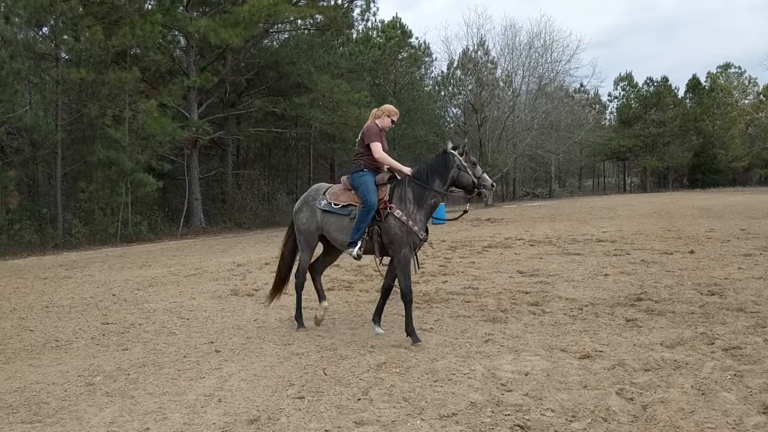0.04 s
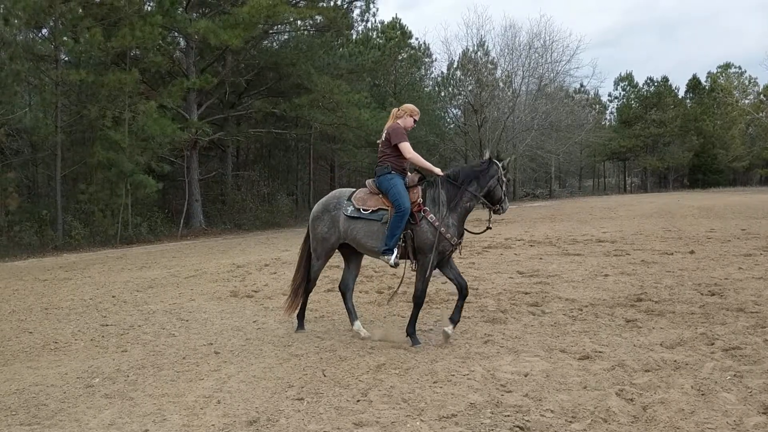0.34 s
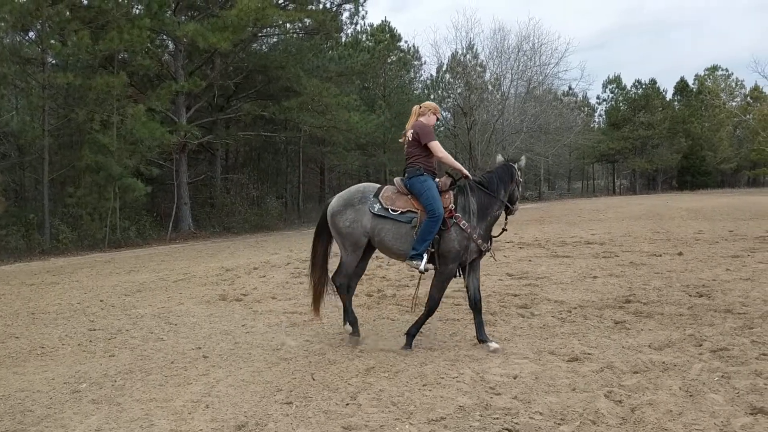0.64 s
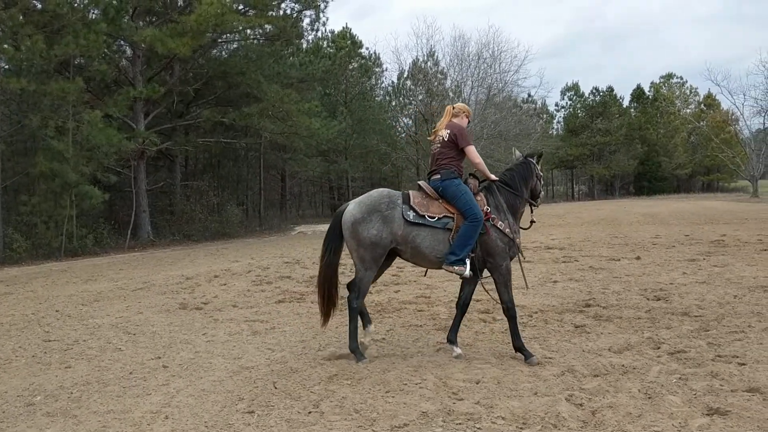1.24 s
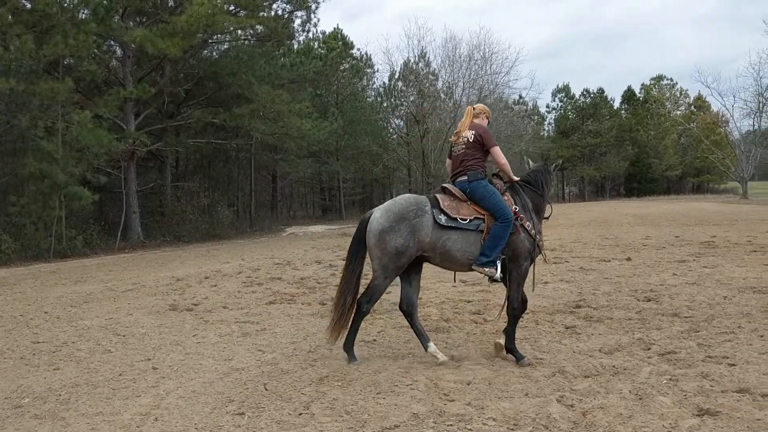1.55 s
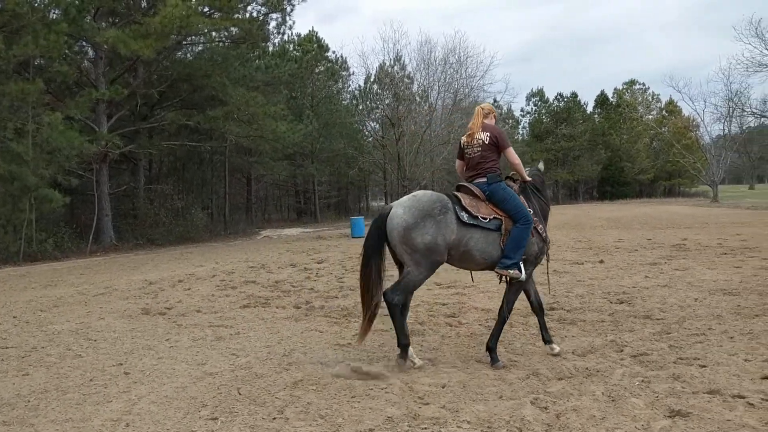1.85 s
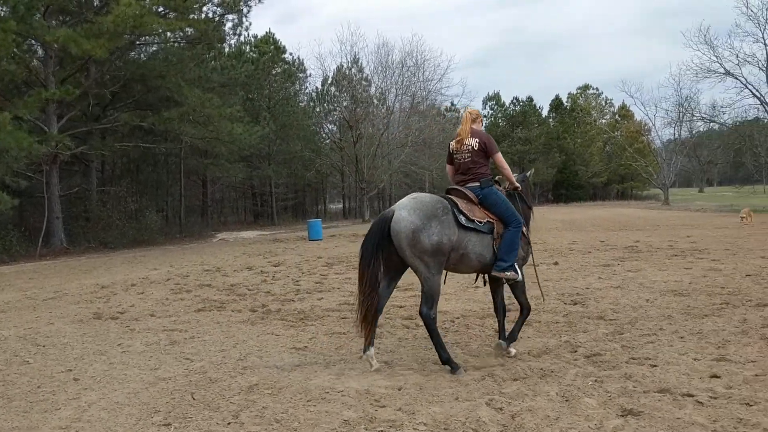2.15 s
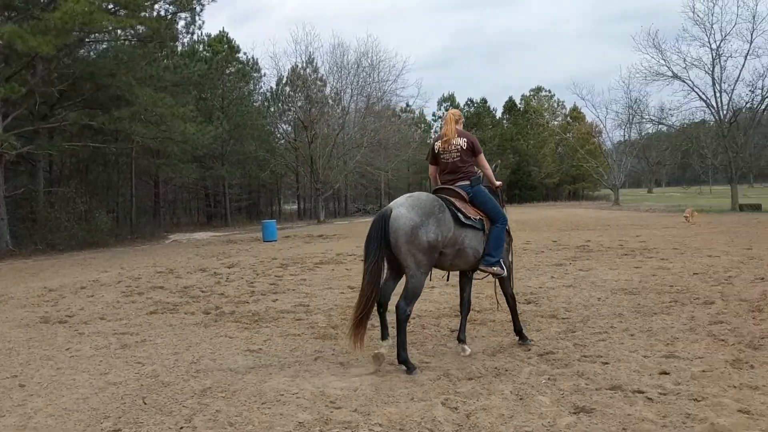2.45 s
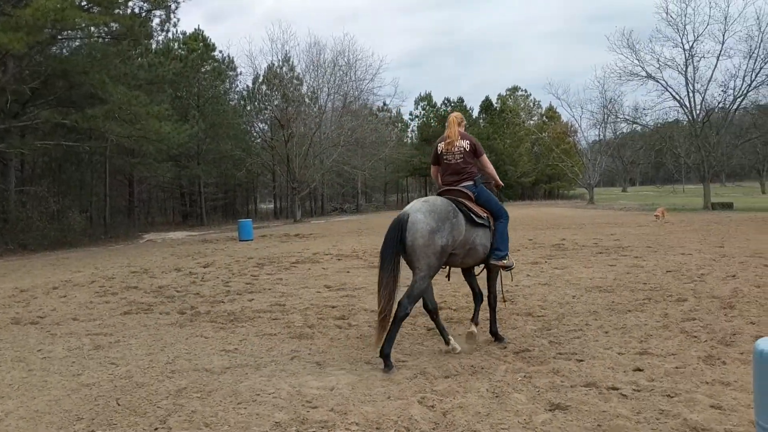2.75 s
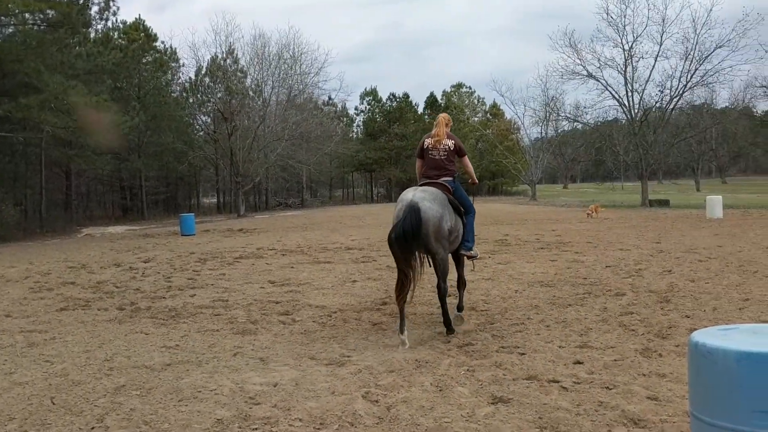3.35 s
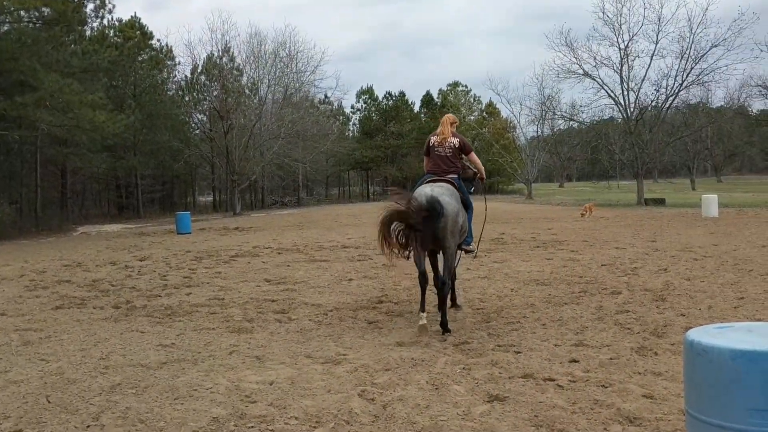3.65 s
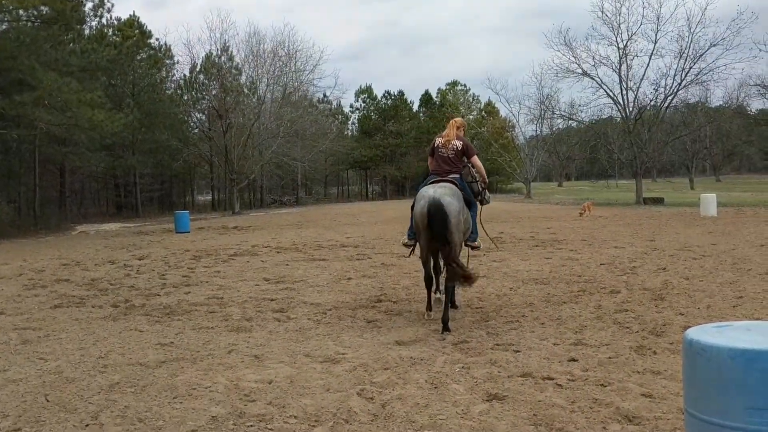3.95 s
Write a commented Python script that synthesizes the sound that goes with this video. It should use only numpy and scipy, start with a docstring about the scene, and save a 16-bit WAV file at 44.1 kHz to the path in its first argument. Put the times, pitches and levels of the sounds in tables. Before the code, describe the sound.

Soft hoof steps and scuffs of a horse pass nearby on sand outdoors, over light wind and a far engine. Buckles clink, birds chirp thinly and the rider seems to cluck six times, before a strap snaps once, sharply.

```python
"""Soft knocks and scuffs of a horse walking on arena sand, over a far engine drone and light wind.
Its tack clinks and ticks; straps slide through a ring. A small bird chirps thinly, another answers from afar.
Six quick smacks, probably the rider clucking the horse on, are tiny pops with cavity resonances.
Near the end a leather strap snaps once. Trees throw back a faint echo."""
import sys
import numpy as np
from scipy import signal
from scipy.fft import rfft, irfft
from scipy.io import wavfile
from scipy.ndimage import uniform_filter1d

SR = 44100
rng = np.random.default_rng(int(sys.argv[2]) if len(sys.argv) > 2 else 0)


def unload_audio(sound):
    """Save the sound as a 16-bit wav file, at the path given as the first command line argument."""
    columns = np.transpose(np.atleast_2d(sound))
    # keep every value between -1 and 1, then stretch to whole-number steps
    steps = np.round(np.clip(columns, -1, 1) * 32767)
    wavfile.write(sys.argv[1], SR, steps.astype(np.int16))


N = 176400

# Spectra of sand grit and of dry tack contact. Each row: frequency in Hz, gain in dB.
GRIT_SPECTRUM = [(300, -6), (800, 2.5), (1500, 0.5), (2200, -4), (4000, -15), (8000, -17.5), (16000, -62)]
TACK_SPECTRUM = [(1500, -10), (3500, -8), (6000, -1), (9000, -8), (11500, -9.5), (14000, -8.5), (17000, -7)]


def amp(db):
    """Decibels to gain."""
    return 10 ** (np.asarray(db) / 20)


def unit(x):
    """Scale to rms 1."""
    return x / np.sqrt(np.mean(x ** 2) + 1e-20)


def curve(points):
    """Interpolate (seconds, value) points to N samples."""
    return np.interp(np.arange(N) / SR, *np.transpose(points))


def clock(length_s):
    """Sample times in seconds."""
    return np.arange(int(length_s * SR)) / SR


def add(mix, start_s, sound):
    """Mix a sound in at start_s."""
    part = mix[max(round(start_s * SR), 0):][:len(sound)]
    part += sound[:len(part)]


def colour(x, spectrum, size=8192):
    """Causal unit-energy filter from (Hz, dB) points."""
    hz, db = np.transpose(spectrum)
    bins_hz = abs(np.fft.fftfreq(size, 1 / SR))
    log_gain = np.log(amp(np.interp(np.log(bins_hz + 1), np.log(hz), db)))
    taps = np.fft.ifft(np.exp(np.conj(signal.hilbert(log_gain)))).real
    if np.sum(taps[size // 2:] ** 2) > np.sum(taps[1:size // 2] ** 2):
        taps = np.roll(taps[::-1], 1)
    taps = taps[:size // 2]
    return signal.fftconvolve(x, taps / np.linalg.norm(taps))[:len(x)]


def resonate(x, hz, width_hz):
    """Single resonance."""
    pole = np.exp((-np.pi * width_hz + 2j * np.pi * hz) / SR)
    return signal.lfilter([1], [1, -pole], x).real


def drift(rate_hz):
    """Low-passed noise, rms 1."""
    lowpass = np.exp(-(np.fft.rfftfreq(N, 1 / SR) / rate_hz) ** 2)
    return unit(irfft(rfft(rng.standard_normal(N)) * lowpass, N))


def grains(t, per_s, spread_db=3):
    """Random impacts of uneven size, rms 1."""
    n = len(t)
    hits = (rng.random(n) < per_s / SR) * rng.choice([-1, 1], n)
    return unit(hits * amp(spread_db * np.minimum(rng.exponential(1, n), 3)))


def patchy(x, depth_db=2.2):
    """Random swells and dips in small time-frequency patches, rms 1."""
    frames = signal.stft(x, nperseg=256, noverlap=192)[2]
    patches = uniform_filter1d(rng.standard_normal(frames.shape), size=6, axis=0)
    patches = unit(uniform_filter1d(patches, size=5, axis=1))
    return unit(signal.istft(frames * amp(depth_db * patches), nperseg=256, noverlap=192)[1][:N])


def engine():
    """Distant wavering drone with two fainter hums above it."""
    # Each row: time in seconds, pitch in Hz.
    pitch_hz = [(0, 74.2), (1.6, 73.6), (2.6, 73.4), (3.5, 74.1)]
    # Each row: harmonic number, level in dB.
    harmonics = [(1, 0), (2, -26.5), (3, -35.5)]
    # Each row: time in seconds, level in dB.
    drone_db = [(0, -49), (.12, -45), (.23, -45.5), (.45, -45.5), (.57, -51.5), (.67, -48.5), (.96, -49.5),
                (1.08, -43.5), (1.2, -51), (1.36, -50.5), (1.47, -45), (1.73, -44), (1.85, -48),
                (2.1, -46.5), (2.27, -52), (2.36, -48), (2.58, -53), (2.67, -47), (2.95, -48), (3.02, -57),
                (3.22, -51.5), (3.3, -65), (3.44, -66), (3.5, -52.5), (3.7, -54), (3.86, -50.5), (4, -58)]
    low_hum_db = [(0, -71), (2.4, -64.5), (2.8, -59), (3.2, -63), (3.55, -80), (3.8, -63), (4, -62.5)]
    high_hum_db = [(0, -71.5), (1.8, -70), (2.4, -86), (4, -84)]
    wander_hz, hum_wander_hz, flutter_db = .25, 2.58, 1.1
    cycles = np.cumsum(curve(pitch_hz) + wander_hz * drift(9.4)) / SR
    drone = sum(amp(db) * np.sin(2 * np.pi * k * cycles) for k, db in harmonics)
    hums = np.zeros(N)
    for hz, hum_db in [(120, low_hum_db), (154.1, high_hum_db)]:
        hum = np.sin(2 * np.pi * np.cumsum(hz + hum_wander_hz * drift(7.87)) / SR)
        hums += unit(hum) * amp(curve(hum_db))
    return unit(drone) * amp(curve(drone_db) + flutter_db * drift(12)) + hums


def air():
    """Low rumble, wind in the trees, uneven hiss and a fine sizzle above it."""
    # Each row: frequency in Hz, gain in dB.
    rumble_spectrum = [(15, -20.5), (30, -32), (38, -15.5), (50, 0), (65, -0.5), (95, 0), (130, -9.5),
                       (200, -13.5), (330, -22), (600, -47)]
    wind_spectrum = [(150, -22), (400, -7), (520, -3.5), (660, 1), (850, -3), (1150, -7.5), (1600, -12.5),
                     (2400, -39.5), (5000, -42.5)]
    hiss_spectrum = [(1060, -6.5), (1800, -0.5), (2170, -3.5), (2340, -3.5), (2550, -5.5), (3220, -6.5),
                     (3510, -6.5), (4080, -7.5), (5450, -7), (6710, -12), (8560, -4), (10700, -17.5),
                     (12100, -16.5), (13900, -11.5), (17000, -17)]
    sizzle_spectrum = [(6000, -27), (10200, 1), (12000, -0.5), (14000, -1), (17000, -7)]
    # Each row: time in seconds, level in dB.
    wind_db = [(0, -59.5), (.5, -63.5), (1, -61), (1.35, -61), (1.8, -59.5), (2.3, -61.5), (2.8, -63.5),
               (3.4, -64), (3.75, -63), (4, -63.5)]
    hiss_db = [(0, -64.5), (.8, -66.5), (1.15, -66), (1.3, -65), (1.68, -66), (1.8, -71.5), (2.1, -68),
               (2.45, -68.5), (4, -66.5)]
    sizzle_db = [(0, -93), (1.1, -92), (1.2, -76), (2, -78.5), (3, -75.5), (4, -81.5)]
    low, mid, high, top = rng.standard_normal((4, N))
    highpass = signal.butter(2, 1300, "high", fs=SR, output="sos")
    hiss = unit(signal.sosfilt(highpass, colour(patchy(high), hiss_spectrum)))
    rumble = colour(low, rumble_spectrum) * amp(-57 + 1.2 * drift(2.3))
    wind = colour(mid, wind_spectrum) * amp(curve(wind_db) + .5 * drift(21))
    hiss *= amp(curve(hiss_db) + .5 * drift(60))
    sizzle = colour(patchy(top), sizzle_spectrum) * amp(curve(sizzle_db))
    return rumble + wind + hiss + sizzle


def crinkle():
    """Sparse crackle of sand and leather: tiny decaying noise bursts."""
    # Each row: frequency in Hz, gain in dB.
    spectrum = [(2000, -24), (8500, 0.5), (16000, -19)]
    # Each row: time in seconds, level in dB.
    level_db = [(0, -86), (1.2, -80), (2.6, -75), (4, -73.5)]
    t, t60_s = clock(.02), .022
    hits = abs(grains(clock(N / SR), per_s=85))
    bursts = signal.fftconvolve(hits, amp(-60 * t / t60_s))[:N]
    return colour(unit(bursts * rng.standard_normal(N)), spectrum) * amp(curve(level_db))


def hoof_scuffs():
    """Hooves drag through sand with a broad crunch."""
    # Each row: start in seconds, length in seconds, level in dB, crunch centre in Hz.
    drags = [(.03, 0.15, -58.5, 900), (0.329, 0.12, -63, 820), (0.861, 0.2, -66.5, 950),
             (3.53, 0.3, -64, 1430), (3.85, 0.13, -60, 1600)]
    out = np.zeros(N)
    for start_s, length_s, db, hz in drags:
        t = clock(length_s)
        sand = colour(grains(t, per_s=400) * np.sqrt(np.sin(np.pi * t / length_s)), GRIT_SPECTRUM)
        crunch = unit(resonate(sand, hz, width_hz=750))
        add(out, start_s, amp(db) * unit(sand + crunch) * np.sqrt(2 / np.pi))
    return out


def hoof_knocks():
    """Each hoof gives a dull knock and a spray of grit."""
    # Each row: start in seconds, level in dB, pitch in Hz, relative grit level in dB.
    steps = [(.058, -49, 910, -4.5), (0.127, -44.5, 940, -22), (0.161, -44, 910, -8),
             (.195, -41.5, 830, -8), (0.271, -55.5, 865, 2.5), (0.496, -52, 1240, 3.5), (.552, -56, 980, 3),
             (.655, -50, 726, -1), (.909, -47, 744, -5), (1.078, -43.5, 676, -8), (1.178, -49, 580, -5),
             (1.716, -47, 625, -7), (1.790, -42, 746, -4), (2.099, -44, 627, -10), (2.165, -42, 630, -9),
             (2.247, -39.5, 640, -15), (3.862, -54, 1515, 0), (3.877, -53, 1650, 1), (3.955, -52, 1900, -4)]
    rise_s, knock_t60_s, grit_t60_s, rough_rad = .0019, .043, .034, .35
    out, t = np.zeros(N), clock(.08)
    for start_s, db, hz, grit_db in steps:
        knock = np.sin(2 * np.pi * hz * t + rough_rad * drift(130)[:len(t)]) * amp(-60 * t / knock_t60_s)
        grit = colour(grains(t, per_s=4000), GRIT_SPECTRUM) * amp(grit_db - 60 * t / grit_t60_s)
        add(out, start_s, amp(db) * np.minimum(t / rise_s, 1) * (knock + grit))
    return out


def tack_clinks():
    """Bit rings and buckles ring with two close, rattling tones."""
    # Each row: start in seconds, level in dB, pitch in Hz, T60 in seconds.
    strikes = [(.692, -59, 8500, 0.074), (1.221, -44, 10100, 0.025), (1.223, -50, 14000, .05),
               (1.23, -43, 13540, 0.029), (1.247, -51, 13900, .035), (2.268, -51.5, 9870, 0.063),
               (2.269, -56, 15800, .05), (2.359, -42.5, 4350, 0.024), (2.548, -53, 13900, .04),
               (2.639, -47, 15200, .016), (2.98, -56, 13100, 0.022), (2.98, -59, 5960, .03),
               (3.168, -56, 5960, .04), (3.191, -45.5, 10030, 0.033), (3.224, -49, 4900, 0.025),
               (3.837, -49.5, 6130, 0.021)]
    rise_s, split_hz, upper_db = .00089, 110, -18
    out, t = np.zeros(N), clock(.094)
    for start_s, db, hz, t60_s in strikes:
        upper = amp(upper_db) * np.sin(2 * np.pi * ((hz + split_hz) * t + rng.random()))
        pair = np.sin(2 * np.pi * hz * t) + upper
        rattle = 1 + .5 * drift(460)[:len(t)]
        add(out, start_s, pair * rattle * np.minimum(t / rise_s, 1) * amp(db - 60 * t / t60_s))
    return out


def strap_slides():
    """Straps rub through a metal ring and excite its resonance."""
    # Each row: start in seconds, length in seconds, level in dB, relative ringing level in dB.
    slides = [(1.168, 0.13, -67, -23), (3.102, 0.042, -64, -11), (3.141, 0.073, -59, -6.5),
              (3.34, 0.046, -63.5, -18)]
    out = np.zeros(N)
    for start_s, length_s, db, ring_db in slides:
        t = clock(length_s)
        rub = grains(t, per_s=3000) * np.sin(np.pi * t / length_s)
        ring = amp(ring_db) * unit(resonate(rub, hz=10100, width_hz=140))
        add(out, start_s, amp(db) * (unit(colour(rub, TACK_SPECTRUM)) + ring) / np.sqrt(2))
    return out


def tack_ticks():
    """Dry ticks of the tack: dense impacts dying fast."""
    # Each row: start in seconds, level in dB.
    ticks = [(1.222, -53), (1.2293, -51.5), (1.379, -54), (2.411, -53), (2.451, -57), (2.549, -59),
             (2.659, -53.5), (2.98, -56.5), (3.192, -47.5), (3.225, -55), (3.427, -54), (3.978, -58.5)]
    out, t, t60_s = np.zeros(N), clock(.094), .031
    for start_s, db in ticks:
        add(out, start_s, colour(grains(t, per_s=6000) * amp(db - 60 * t / t60_s), TACK_SPECTRUM))
    return out


def bird():
    """Thin whistles that flick up, slide down and level out."""
    # Each row: start in seconds, length in seconds, level in dB, top and end pitch in Hz, share rising.
    chirps = [(1.271, 0.046, -55.5, 8300, 6360, 0.19), (1.983, 0.038, -57, 8930, 6050, 0.069),
              (2.086, 0.063, -58.5, 6670, 5700, 0.15), (2.185, 0.089, -59, 6400, 5700, 0.2),
              (2.326, 0.053, -60.5, 7300, 6100, .35), (3.753, 0.042, -57, 8900, 7050, 0.05)]
    start_ratio, waver, rough_rad, flicker_db = .86, .008, .22, 3
    out = np.zeros(N)
    for start_s, length_s, db, top_hz, end_hz, rise in chirps:
        u = clock(length_s) / length_s
        rise_left = np.maximum(1 - u / rise, 0)
        fall = np.maximum(u - rise, 0) / (1 - rise)
        hz = top_hz * (1 - (1 - start_ratio) * rise_left ** 2)
        hz += (end_hz - top_hz) * (fall + np.sin(np.pi * fall / 2) ** 2) / 2
        hz *= 1 + waver * drift(300)[:len(u)]
        whistle = np.sin(2 * np.pi * np.cumsum(hz) / SR + rough_rad * drift(1100)[:len(u)])
        envelope = amp(db + flicker_db * drift(80)[:len(u)]) * np.sin(np.pi * u) ** .59
        add(out, start_s, envelope * whistle)
    return out


def smacks():
    """Each smack: a run of tiny pops plus three rough resonances of a small cavity."""
    # Each row: start in seconds, level in dB, low resonance in Hz, middle resonance in Hz and relative dB,
    # high resonance in Hz and relative dB, relative crackle level in dB.
    clucks = [(1.513, -51, 2190, 3870, 0, 5150, -4, -6), (1.71, -44, 2270, 3810, 10, 4330, 9, -4.5),
              (1.9238, -49, 2660, 3420, -1, 4180, 3, -1), (2.158, -48.5, 2774, 4210, -10, 4930, -17, -4),
              (2.403, -50.5, 2310, 4250, -8, 6310, -12, 6), (2.6359, -47, 2805, 3400, -18, 4840, -17, 1.5)]
    # Each row: frequency in Hz, gain in dB.
    body_spectrum = [(900, -28), (1600, 4), (2200, -1.5), (3200, -4), (5300, 0.5), (6500, -3), (9000, -27)]
    crackle_spectrum = [(600, -21), (1400, -21), (2200, 11.5), (5200, -5.5), (6800, -1), (9500, 0.5),
                        (13000, -8), (16000, -27)]
    rise_s, hold_s, t60_s, rough_rad, body_db = .00088, .008, .018, .5, -3
    out, t = np.zeros(N), clock(.03)
    envelope = np.minimum(t / rise_s, 1) * amp(-60 * np.maximum(t - hold_s, 0) / t60_s)
    for start_s, db, low_hz, mid_hz, mid_db, high_hz, high_db, crackle_db in clucks:
        pops = envelope * grains(t, per_s=3000)
        low, mid, high = (unit(envelope * np.sin(2 * np.pi * hz * t + rough_rad * drift(460)[:len(t)]))
                          for hz in (low_hz, mid_hz, high_hz))
        cavity = unit(low + amp(mid_db) * mid + amp(high_db) * high)
        body = amp(body_db) * unit(colour(pops, body_spectrum))
        crackle = amp(crackle_db) * unit(colour(pops, crackle_spectrum))
        add(out, start_s, amp(db) * unit(cavity + body + crackle) * np.sqrt(np.mean(envelope ** 2)))
    return out


def far_bird():
    """Faint rising notes, each a pair of close whistles."""
    # Each row: start in seconds, length in seconds, level in dB, starting pitch in Hz.
    notes = [(2.55, .05, -73, 3980), (2.655, .05, -71.5, 4330), (2.76, .06, -73, 4180)]
    rise_hz_per_s, split_hz, rough_rad = 4500, 320, .55
    out = np.zeros(N)
    for start_s, length_s, db, hz in notes:
        t = clock(length_s)
        phases = (2 * np.pi * np.cumsum(f + rise_hz_per_s * t) / SR for f in (hz, hz + split_hz))
        pair = sum(np.sin(phase + rough_rad * drift(200)[:len(t)]) for phase in phases)
        add(out, start_s, amp(db) * np.sqrt(np.sin(np.pi * t / length_s)) * pair)
    return out


def rein_swishes():
    """A falling band of noise, as of a rein drawn over leather."""
    # Each row: start in seconds, length in seconds, level in dB, start and end centre in Hz.
    strokes = [(3.108, .036, -58, 4800, 1673), (3.347, .035, -61, 2820, 1680)]
    out, width_hz = np.zeros(N), 1400
    for start_s, length_s, db, start_hz, end_hz in strokes:
        u = clock(length_s) / length_s
        sweep = np.sin(2 * np.pi * np.cumsum(start_hz * (end_hz / start_hz) ** u) / SR)
        add(out, start_s, amp(db) * np.sqrt(np.sin(np.pi * u)) * sweep * drift(width_hz)[:len(u)])
    return out


def strap_snap():
    """A leather strap slaps once, rebounds and rustles."""
    # Each row: start in seconds, peak in dB.
    slaps = [(3.6765, -20), (3.6797, -32), (3.6812, -31), (3.6836, -36)]
    # Each row: frequency in Hz, gain in dB.
    spectrum = [(200, -15), (700, -11), (1300, -6), (2400, 1), (3600, -8), (5500, -7), (8000, -9),
                (11000, -16), (16000, -14.5)]
    rustle_db, rustle_t60_s = -51, .099
    out, t = np.zeros(N), clock(.08)
    crack = colour(1. * (t == 0), spectrum)
    for start_s, db in slaps:
        add(out, start_s, -amp(db) * crack / abs(crack).max())
    rustle = grains(t, per_s=5000) * amp(rustle_db - 60 * t / rustle_t60_s)
    add(out, slaps[0][0], colour(rustle, spectrum))
    return out


def tree_echo(x, t60_s):
    """Diffuse tail thrown back by the trees."""
    t = clock(.5)
    tail = rng.standard_normal(len(t)) * amp(-60 * t / t60_s)
    return signal.fftconvolve(x, tail / np.linalg.norm(tail))[:N]


def scene():
    """Mono mix: near sounds with a faint echo, birds with a stronger one, engine and air."""
    hooves = hoof_knocks() + hoof_scuffs()
    rider = smacks()
    tack = tack_clinks() + tack_ticks() + strap_slides()
    near = hooves + rider + tack + crinkle() + rein_swishes() + strap_snap()
    birds = bird() + far_bird()
    echo = tree_echo(amp(-15.5) * near + amp(-13) * birds, t60_s=.1)
    return (near + birds + echo + engine() + air())[None]


def record(dry):
    """Steep low-pass band limit."""
    cutoff_hz = 17050
    lowpass = signal.firwin(511, cutoff_hz, window=("kaiser", 9), fs=SR)
    return signal.oaconvolve(dry, lowpass[None], "same")


dry = scene()
out = record(dry)
unload_audio(out)
```